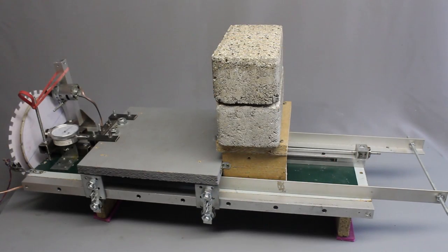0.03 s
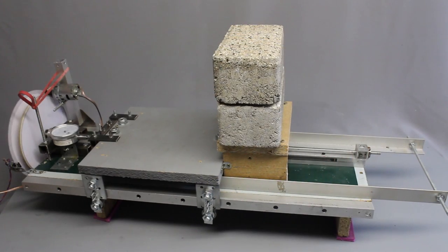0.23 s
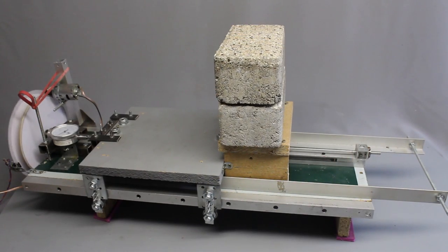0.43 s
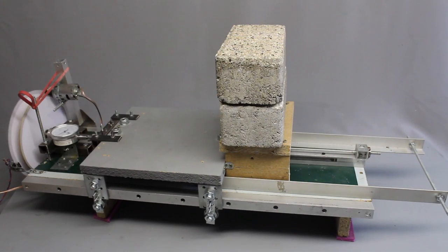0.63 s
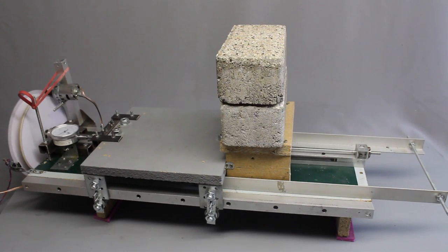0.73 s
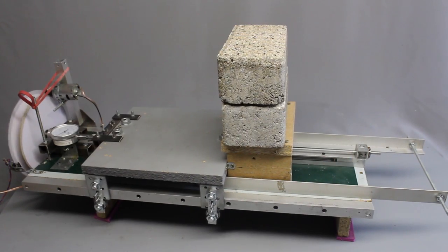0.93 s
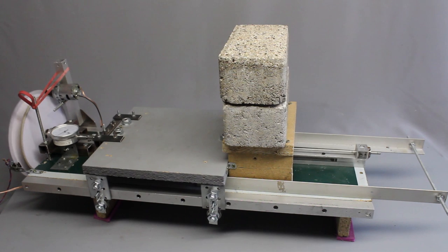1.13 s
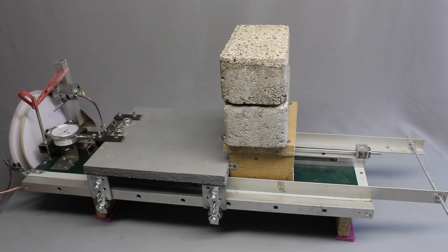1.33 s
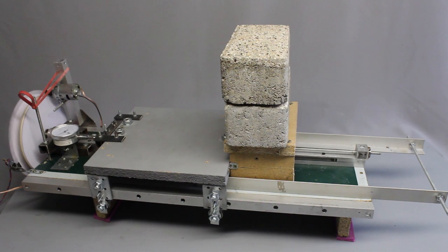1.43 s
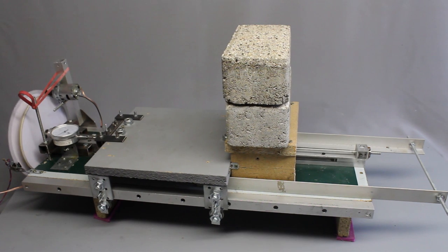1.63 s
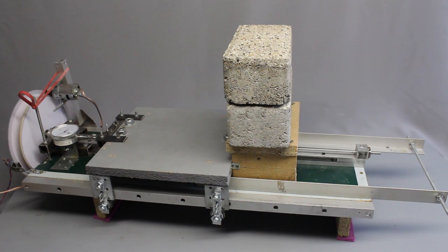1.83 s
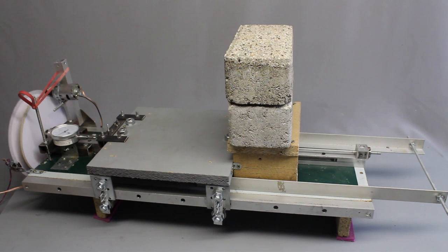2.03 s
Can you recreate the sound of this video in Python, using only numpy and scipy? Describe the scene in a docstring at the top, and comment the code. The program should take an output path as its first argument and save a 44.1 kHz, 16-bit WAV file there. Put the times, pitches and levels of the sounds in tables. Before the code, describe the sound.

A small electric gear motor starts at about 0.1 seconds over faint workshop air, with a few quick knocks as it takes the load. From 0.2 seconds until the end, around 2 seconds, it runs steadily with a hum, a whine of several tones and chattering gears. The threaded rod it turns rubs and lightly rings the metal frame about nine times a second, with faint scattered ticks.

```python
"""A small pulse-driven gear motor starts and turns a threaded rod, pushing a loaded carriage along
a metal frame. The windings whine at the pulse rate, slack closes with knocks, the thread ticks, and
the gears hum and chatter into the frame. The rod rubs and the frame pings at the same angles each turn.
Before the start, only workshop air and a faint mains buzz; near the end, a low rumble swells."""
import sys
import numpy as np
from scipy import signal
from scipy.fft import rfft, irfft, next_fast_len
from scipy.io import wavfile

SR = 44100
rng = np.random.default_rng(int(sys.argv[2]) if len(sys.argv) > 2 else 0)


def wav_out(sig):
    """Save sig, one row per channel (or a flat mono array), as 16-bit PCM at SR to the path in sys.argv[1]."""
    wavfile.write(sys.argv[1], SR, np.round(np.clip(np.atleast_2d(sig).T, -1, 1) * 32767).astype(np.int16))


N = 91728
TIME = np.arange(N) / SR
START_S, SPIN_UP_S, START_TURNS, NOMINAL_TURNS_PER_S = .099, .07, .16, 9.3

# Workshop air: frequency_hz, relative_density_db
AIR_SPECTRUM = [(25, 7), (80, 1), (400, 0.5), (1000, 2), (1800, -3), (2350, 5), (2700, -2), (3100, 1),
                (4500, -9), (8000, -4), (15500, -4.5)]
# Supply whine: harmonic, level_db
WHINE_HARMONICS = [(1, -54.5), (2, -57.5), (3, -76), (4, -62), (5, -63)]
# Thread and carriage ticks: start_s, force_db
THREAD_TICKS = [(0.099, -53), (0.157, -58), (0.4936, -47.5), (.6126, -49), (0.8315, -51), (1.128, -48.5),
                (1.4635, -58), (1.567, -56), (1.610, -50), (1.931, -52), (1.981, -50)]
# Tick filter: frequency_hz, gain_db
TICK_SPECTRUM = [(200, -24), (700, 10), (3000, 5), (5500, 1), (8300, 8.5), (11000, 1), (15500, 1)]
# Frame resonances: centre_hz, width_hz, lift_db
FRAME_MODES = [(395, 18, 6.5), (604, 34, 9.5), (764, 45, 4), (1293, 14.7, 12), (1680, 16, 3), (2087, 41, 5),
               (2486, 79, 3.5), (3060, 93, 5), (4206, 150, 5), (5070, 150, 2.5), (7750, 120, 2),
               (8550, 110, 7.5), (10500, 150, 8), (12300, 120, -5), (14850, 200, -2)]
# Loaded rod speed, before the spin-up ramp: time_s, turns_per_s
ROD_SPEED = [(.17, 9.6), (.3, 9.6), (.4, 9.37), (1.05, 9.36), (1.3, 9.12), (1.58, 9.1), (1.72, 9.45),
             (2.08, 9.45)]
# Motor and gear tones at nominal speed: pitch_hz, level_db, rough_share, swell_depth, swell_angle_turns
HUM_TONES = [(37.3, -93, .05, 0, 0), (56, -80, .05, 0, 0), (74, -68, 0.06, 0.04, 0.8),
             (109.3, -75.5, 0.25, 0.4, 0.64), (128.6, -71, 0.04, 0.05, .7), (319, -65.5, 0.09, 0.45, 0.72),
             (377.2, -57.5, 0.1, 0.67, 0.77), (589.2, -53, 0.23, 0.34, 0.51), (655, -56, 0.02, 1, 0.96),
             (741, -52, 0.22, 0.32, 0.67), (823.5, -57, 0.08, .5, 0.36), (919, -56, 0.34, 0.15, 0.47),
             (2138, -66, 0.1, 0.4, .35), (2260, -59.5, 0.27, 0.2, 0)]
# Drone envelope: time_s, level_db
DRONE_LEVELS = [(.15, -81), (.5, -71.5), (.7, -70.5), (1.0, -77), (1.25, -67), (1.55, -65.5), (1.8, -73.5),
                (2.08, -73)]
# Gear chatter: frequency_hz, relative_density_db
CHATTER_SPECTRUM = [(30, -57), (70, -34), (110, -16), (165, -22), (250, -19.5), (320, -13), (440, -9.5),
                    (580, -5.5), (780, -2), (950, -5), (1180, -10), (1500, -8.5), (1850, -9.5), (2150, -3),
                    (2450, -8.5), (2700, -12.5), (3200, -12), (3550, -17.5), (4600, -21.5), (5400, -19),
                    (7500, -20.5), (9700, -26), (12000, -24), (15000, -29), (16000, -33)]
# Knocks as the gears take load: start_s, fade_s, low_hz, high_hz, level_db
SLACK_KNOCKS = [(.101, 0.057, 514, 780, -50.5), (0.105, .025, 960, 1190, -51.5),
                (.122, 0.028, 1890, 2650, -57), (.141, .009, 3400, 3620, -47.5),
                (0.16, 0.019, 606, 840, -40), (0.197, 0.007, 546, 980, -35.5)]
# Tight spots on the rod: angle_turns, rise_turns, fade_turns, low_hz, high_hz, level_db
TIGHT_SPOTS = [(0.95, 0.024, 0.072, 1080, 1720, -49), (.29, 0.012, 0.055, 5100, 7200, -48.5),
               (.53, 0.0088, 0.052, 7400, 9400, -55), (.59, 0.021, 0.095, 488, 673, -44),
               (.69, 0.043, 0.043, 635, 1030, -45.5), (.77, 0.0073, 0.11, 3320, 5700, -52.5),
               (0.836, 0.034, 0.087, 5400, 8400, -51), (0.76, 0.012, 0.11, 8900, 15000, -59.5)]
# Frame parts ringing once a turn: angle_turns, width_turns, pitch_hz, level_db
FRAME_PINGS = [(.34, 0.037, 2133, -44.5), (.55, 0.053, 764.7, -44.5), (.95, 0.057, 739.3, -45)]


def from_db(db):
    """Decibels to gain."""
    return 10 ** (np.asarray(db) / 20)


def unit_rms(x):
    """Scale to rms 1."""
    return x / np.sqrt(np.mean(x ** 2) + 1e-20)


def drift(corner_hz):
    """Low-passed random motion, rms about 1."""
    step, settle = 20, 2000
    pole = np.exp(-2 * np.pi * corner_hz * step / SR)
    noise = rng.standard_normal(N // step + settle + 2)
    slow = signal.lfilter([1], [1, -2 * pole, pole * pole], noise)[settle:]
    return np.interp(np.arange(N) / step, np.arange(len(slow)), unit_rms(slow))


def band(x, low_hz, high_hz):
    """Band-pass, rms 1."""
    return unit_rms(signal.sosfilt(signal.butter(2, [low_hz, high_hz], "band", fs=SR, output="sos"), x))


def colour(x, spectrum, modes=()):
    """Minimum-phase filter: broad spectrum plus narrow resonances."""
    size = 2 * next_fast_len(N)
    hz = np.maximum(np.arange(size // 2 + 1) * SR / size, 1)
    points_hz, points_db = np.transpose(spectrum)
    gain_db = np.interp(np.log(hz), np.log(points_hz), points_db)
    for centre_hz, width_hz, lift_db in modes:
        gain_db += lift_db / (1 + (2 * (hz - centre_hz) / width_hz) ** 2)
    cepstrum = irfft(np.log(from_db(gain_db)))[:size // 2]
    cepstrum[1:] *= 2
    return irfft(rfft(x, size) * np.exp(rfft(cepstrum, size)))[:N]


def workshop_reverb(x, t60_s=.26, tail_db=-7.5):
    """Direct sound plus a short diffuse tail."""
    age_s = TIME[:SR // 2]
    tail = rng.standard_normal(len(age_s)) * from_db(-60 * age_s / t60_s)
    return x + from_db(tail_db) * signal.fftconvolve(x, tail / np.linalg.norm(tail))[:N]


def workshop_air(level_db=-68.5):
    """Steady broadband room noise."""
    return from_db(level_db) * unit_rms(colour(rng.standard_normal(N), AIR_SPECTRUM))


def mains_buzz(repeat_hz=100, decay_s=.0022, level_db=-72.5):
    """One thin noise burst, repeated every mains half-cycle."""
    age_s = np.arange(SR // repeat_hz) / SR
    burst = rng.standard_normal(len(age_s)) * np.exp(-age_s / decay_s)
    return from_db(level_db) * band(np.resize(burst, N), low_hz=9400, high_hz=11900)


def drive_whine(pulse_hz=489.7, rise_s=.018, flicker_db=1.5):
    """The windings sing at the supply's fixed pulse rate."""
    age_s = np.maximum(TIME - START_S, 0)
    out = 0
    for harmonic, level_db in WHINE_HARMONICS:
        level = from_db(level_db + flicker_db * drift(25))
        out += level * np.sin(2 * np.pi * harmonic * pulse_hz * age_s)
    return np.sqrt(2) * np.minimum(age_s / rise_s, 1) * out


def thread_ticks(decay_s=.0084):
    """Play in the thread closes with brief cracks that ring the frame."""
    force = sum(from_db(force_db) * (TIME >= start_s) * np.exp(-np.abs(TIME - start_s) / decay_s)
                for start_s, force_db in THREAD_TICKS)
    return colour(force * rng.standard_normal(N), TICK_SPECTRUM, FRAME_MODES)


def gear_hum(speed_ratio, turns, flutter_hz=19.3):
    """Speed-locked motor and gear tones; all flutter, most swell once a turn."""
    rad_per_hz = 2 * np.pi * np.cumsum(speed_ratio) / SR
    out = 0
    for pitch_hz, level_db, rough_share, swell_depth, swell_turns in HUM_TONES:
        flutter = drift(flutter_hz) + 1j * drift(flutter_hz)
        amplitude = np.sqrt(2 * (1 - rough_share)) + np.sqrt(rough_share) * flutter
        swell = 1 + swell_depth * np.cos(2 * np.pi * (turns - swell_turns))
        carrier = np.exp(1j * (pitch_hz * rad_per_hz + rng.uniform(0, 2 * np.pi)))
        out += from_db(level_db) * swell * np.real(amplitude * carrier)
    return out * speed_ratio ** 2


def drive_drone(speed_ratio, nominal_hz=190.8):
    """A clean low drive tone: pitch follows speed, level follows a timed envelope."""
    level = from_db(np.interp(TIME, *np.transpose(DRONE_LEVELS)))
    return np.sqrt(2) * level * np.sin(2 * np.pi * nominal_hz * np.cumsum(speed_ratio) / SR)


def gear_chatter(speed_ratio, turns, level_db=-41.5):
    """Tooth contacts, recurring or random, and sliding hiss shake the frame."""
    recurring_per_turn, loose_per_s, recurring_share = 96, 900, .43
    loose_spread_db, sliding_db, flicker_db = 2, 1, .65
    contact_turns = np.sort(rng.random(recurring_per_turn))
    strengths = rng.standard_normal(recurring_per_turn)
    contact = np.searchsorted(contact_turns, turns % 1) % recurring_per_turn
    recurring = strengths[contact] * (np.diff(contact, prepend=contact[0]) != 0)
    loose_db = np.minimum(rng.exponential(1, N), loose_spread_db)
    loose = from_db(loose_db) * rng.choice([-1, 1], N) * (rng.random(N) < loose_per_s / SR)
    impacts = np.sqrt(recurring_share) * unit_rms(recurring)
    impacts += np.sqrt(1 - recurring_share) * unit_rms(loose)
    sliding = from_db(sliding_db) * rng.standard_normal(N)
    force = (impacts + sliding) * speed_ratio ** 1.04 * from_db(flicker_db * drift(17))
    return from_db(level_db) * unit_rms(colour(workshop_reverb(force), CHATTER_SPECTRUM, FRAME_MODES))


def slack_knocks(rise_s=.0047):
    """Drive slack closes in short knocks as the motor spins up."""
    out = 0
    for start_s, fade_s, low_hz, high_hz, level_db in SLACK_KNOCKS:
        age_s = np.maximum(TIME - start_s, 0)
        envelope = np.minimum(age_s / rise_s, 1) * np.exp(-(age_s / fade_s) ** 2)
        out += from_db(level_db) * envelope * band(rng.standard_normal(N), low_hz, high_hz)
    return out


def rod_rubs(speed_ratio, turns, grain_db=1.5, spread_db=1):
    """Each tight spot catches and scrapes in its own band, once a turn."""
    grain = from_db(grain_db * drift(240))
    out = 0
    for angle_turns, rise_turns, fade_turns, low_hz, high_hz, level_db in TIGHT_SPOTS:
        offset_turns = (turns - angle_turns + .5) % 1 - .5
        width_turns = np.where(offset_turns < 0, rise_turns, fade_turns)
        pressure = np.exp(-.5 * (offset_turns / width_turns) ** 2)
        level = from_db(level_db + spread_db * drift(5))
        out += level * pressure * band(grain * rng.standard_normal(N), low_hz, high_hz)
    return out * speed_ratio ** 2


def frame_pings(speed_ratio, turns, spread_db=1.5, wander_rad=.76):
    """Catches in the drive ring parts of the frame briefly, once a turn."""
    out = 0
    for angle_turns, width_turns, pitch_hz, level_db in FRAME_PINGS:
        offset_turns = (turns - angle_turns + .5) % 1 - .5
        envelope = np.exp(-.5 * (offset_turns / width_turns) ** 2)
        level = np.sqrt(2) * from_db(level_db + spread_db * drift(5.5))
        out += level * envelope * np.sin(2 * np.pi * pitch_hz * TIME + wander_rad * drift(40))
    return out * speed_ratio ** 2


def low_rumble(start_s=1.9, rise_s=.1, level_db=-65):
    """Deep noise fades in and holds."""
    envelope = np.clip((TIME - start_s) / rise_s, 0, 1)
    return from_db(level_db) * envelope * band(rng.standard_normal(N), low_hz=20, high_hz=55)


def scene():
    """Mono mix; rod speed and angle drive the rotating parts."""
    spin_up = np.clip((TIME - START_S) / SPIN_UP_S, 0, 1)
    turns_per_s = np.interp(TIME, *np.transpose(ROD_SPEED)) * spin_up
    speed_ratio = turns_per_s / NOMINAL_TURNS_PER_S
    turns = START_TURNS + np.cumsum(turns_per_s) / SR
    gears = gear_hum(speed_ratio, turns) + drive_drone(speed_ratio) + gear_chatter(speed_ratio, turns)
    rod = rod_rubs(speed_ratio, turns) + frame_pings(speed_ratio, turns)
    machine = gears + rod + drive_whine() + slack_knocks() + thread_ticks()
    return (machine + workshop_air() + mains_buzz() + low_rumble())[None]


def record(dry):
    """Steep treble cut."""
    cutoff_hz = 15800
    return signal.sosfilt(signal.ellip(12, .1, 80, cutoff_hz, fs=SR, output="sos"), dry)


dry = scene()
out = record(dry)
wav_out(out)
```